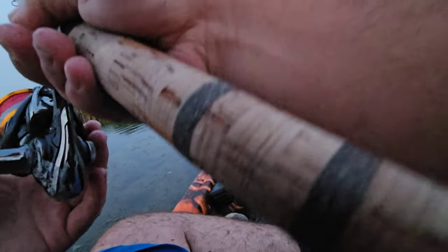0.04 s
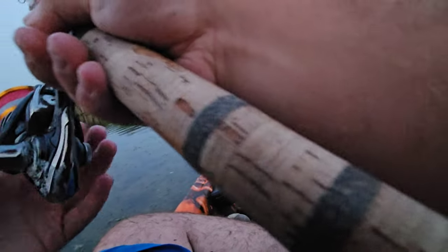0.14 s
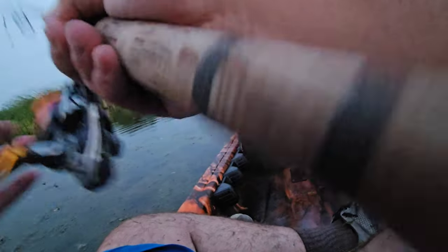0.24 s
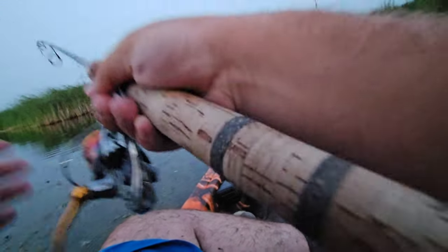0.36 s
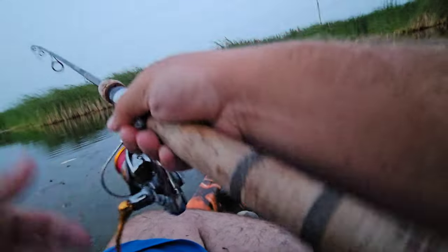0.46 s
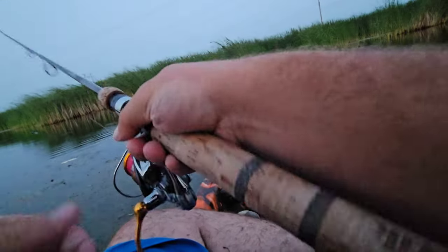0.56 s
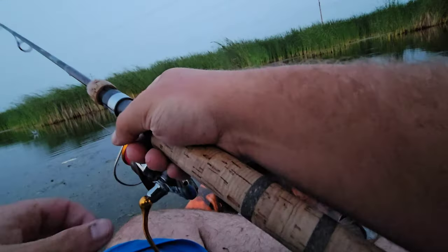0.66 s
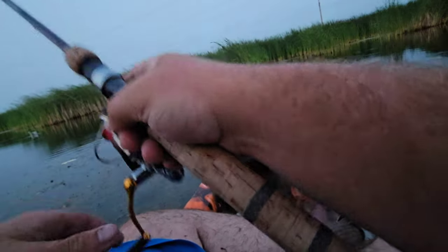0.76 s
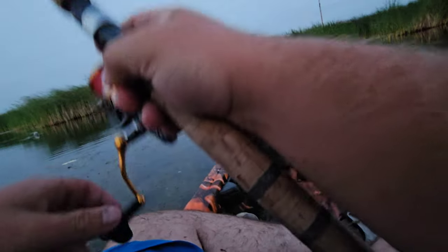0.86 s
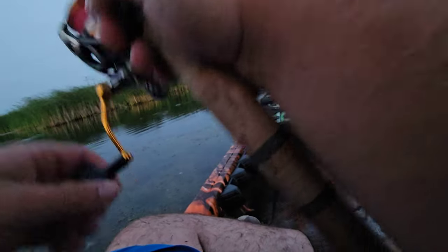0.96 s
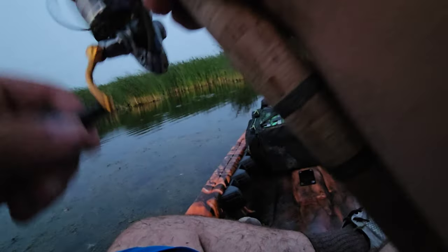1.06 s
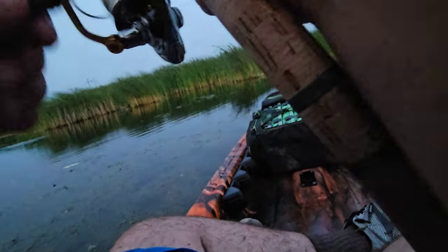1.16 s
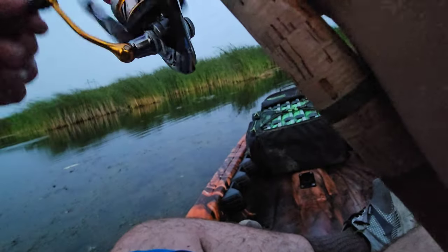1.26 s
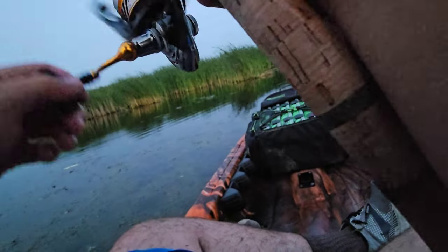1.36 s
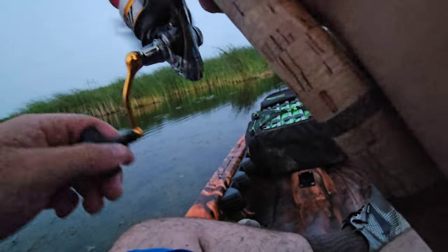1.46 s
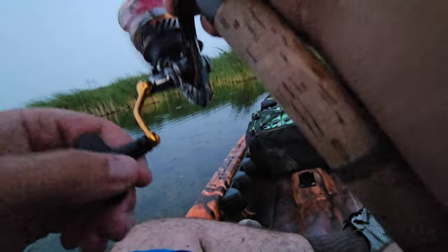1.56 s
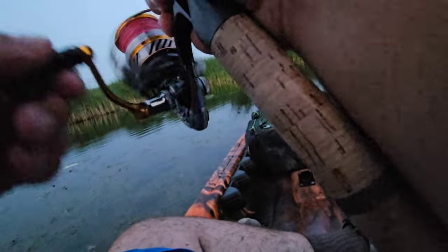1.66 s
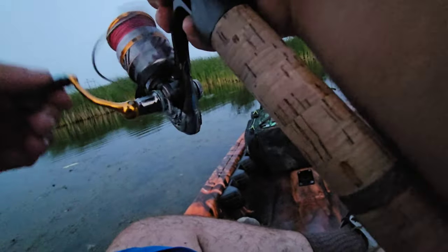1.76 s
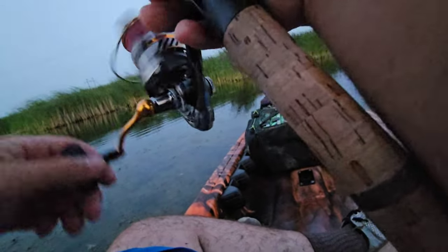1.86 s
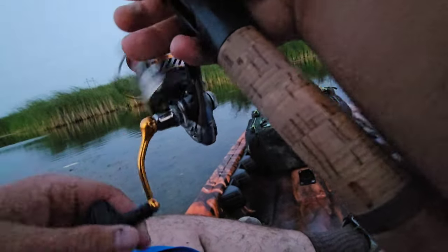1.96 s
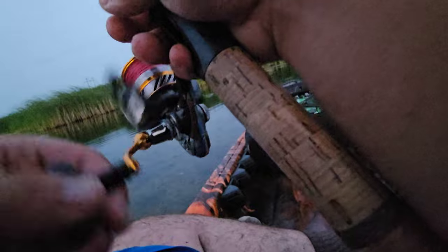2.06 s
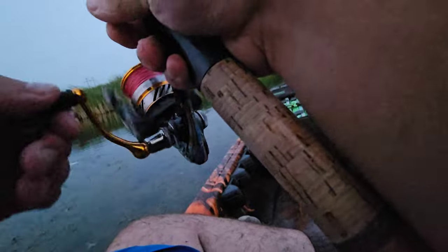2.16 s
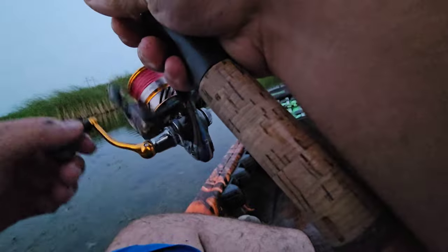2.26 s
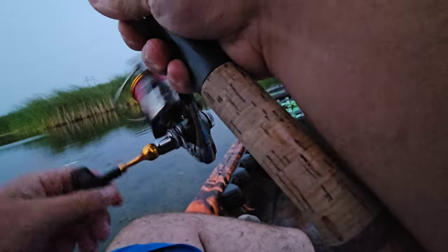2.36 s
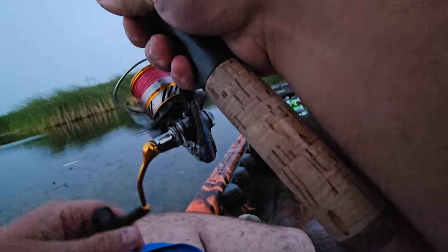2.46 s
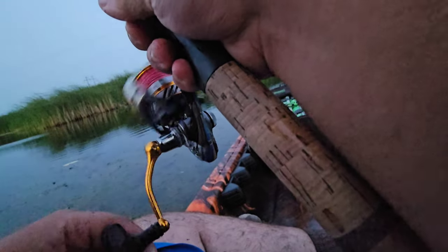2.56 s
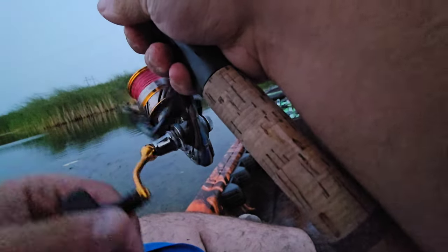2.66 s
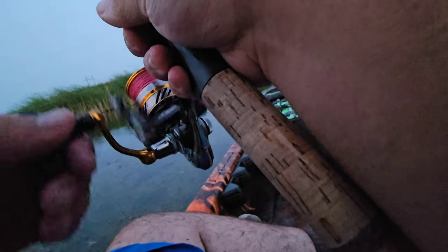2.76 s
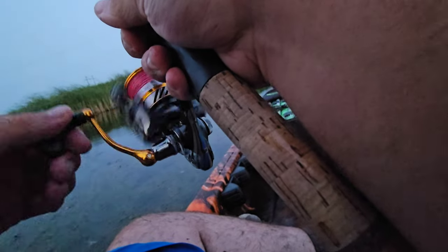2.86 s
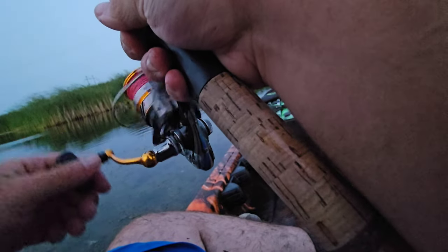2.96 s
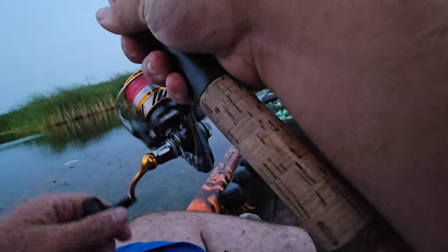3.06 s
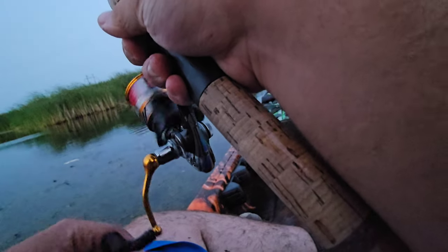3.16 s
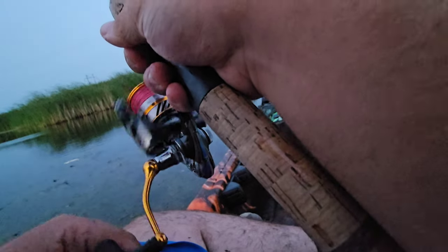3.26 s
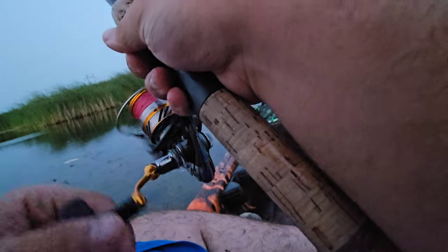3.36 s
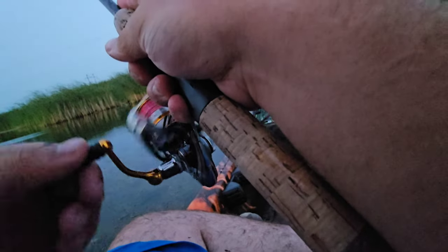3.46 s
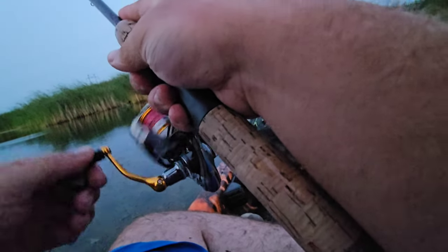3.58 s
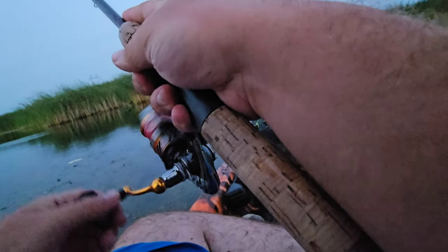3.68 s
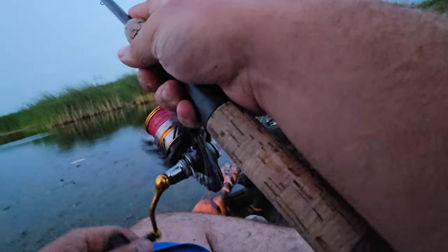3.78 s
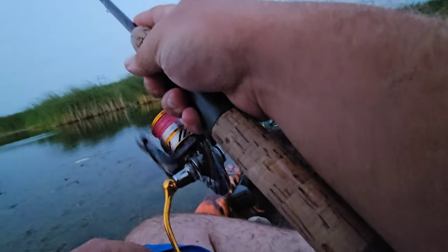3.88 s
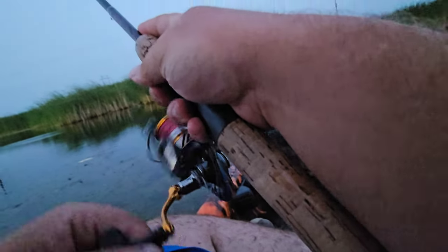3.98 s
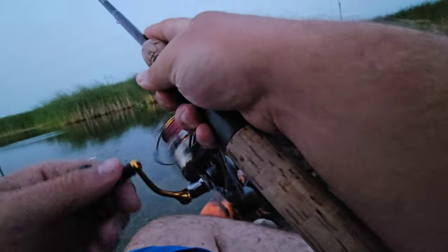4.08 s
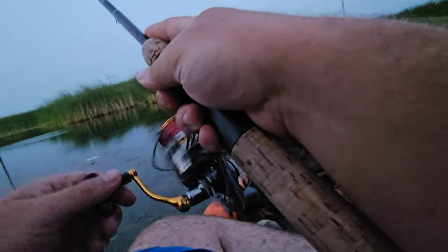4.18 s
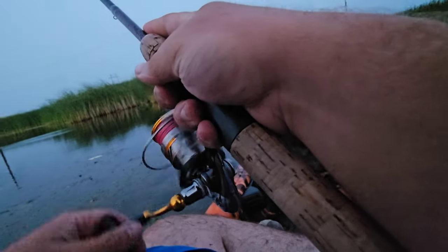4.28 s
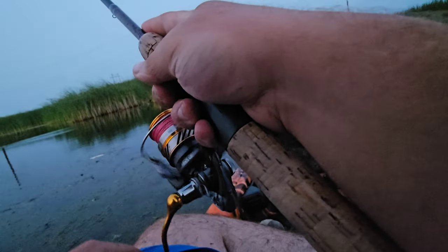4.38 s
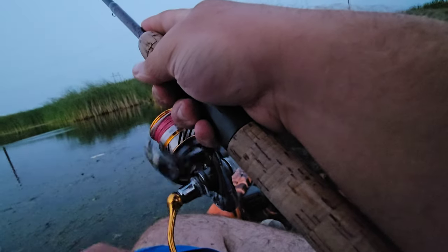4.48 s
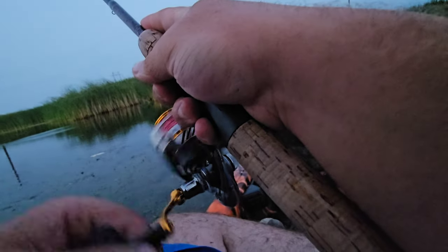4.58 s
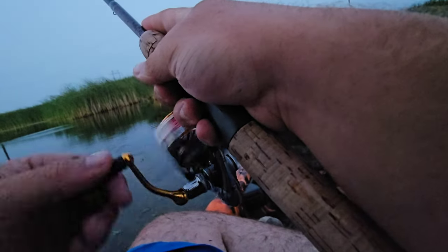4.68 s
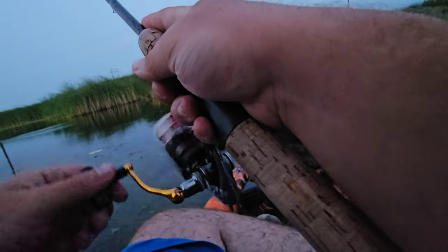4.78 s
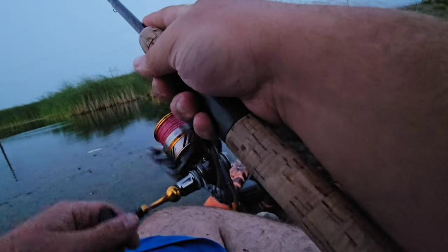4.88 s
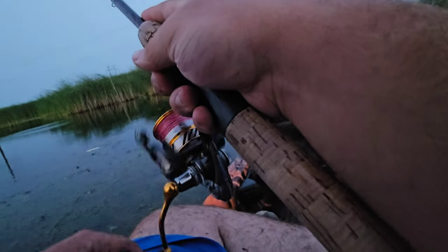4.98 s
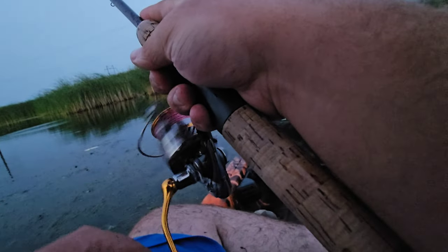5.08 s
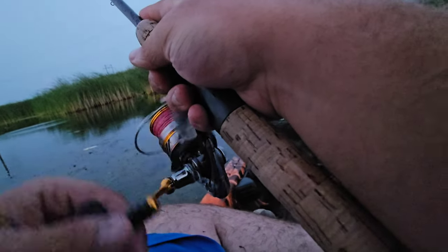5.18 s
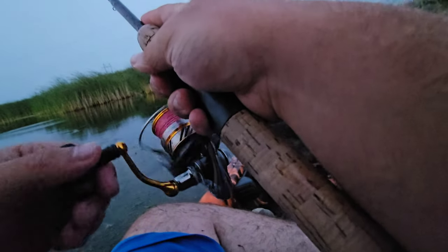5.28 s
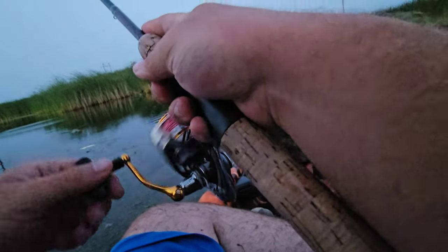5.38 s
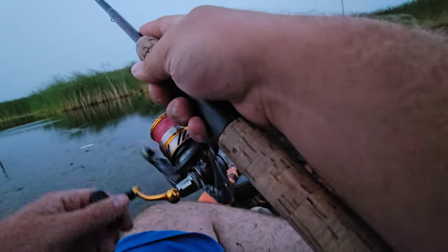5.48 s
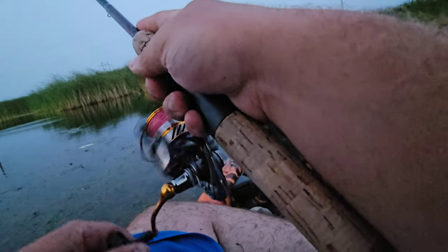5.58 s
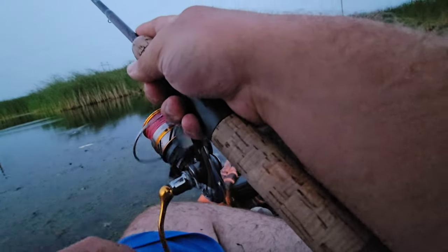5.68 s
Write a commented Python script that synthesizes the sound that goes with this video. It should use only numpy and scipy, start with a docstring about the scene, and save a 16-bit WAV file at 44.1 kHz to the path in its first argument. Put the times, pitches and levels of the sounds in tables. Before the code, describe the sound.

A metal bail snaps with clustered bright clicks and a dying loose rattle, followed by a short hollow knock. Just before one second cranking begins: a dry rasp with a low whine, surging with each turn, quickest around two seconds. Sparse ticks and dull bumps follow over faint breeze and hiss, heard close and dry outdoors.

```python
"""An angler in a small boat on a calm lake snaps the bail of a spinning reel shut and cranks the line in.
Light air rumbles and a thin line hiss runs throughout: filtered noise with moving levels.
At 0.1 s the bail clashes and rattles: noise bursts, damped modes and showers of tiny contacts.
Rod knocks and hull plops follow as damped tones. From 0.88 s gear-flank roughness, read at the uneven
cranking speed, rasps and whines; the mechanism ticks, and from 2 s the hands bump the rod with low thumps."""
import sys
import numpy as np
from scipy import signal
from scipy.fft import rfft, irfft, next_fast_len
from scipy.io import wavfile
from scipy.ndimage import uniform_filter1d

SR = 44100
rng = np.random.default_rng(int(sys.argv[2]) if len(sys.argv) > 2 else 0)


def generate_wav(sig):
    """Save sig (samples, or channels by samples) to the path in sys.argv[1] as 16-bit PCM at SR."""
    pcm = np.round(np.clip(np.atleast_2d(sig).T, -1, 1) * 32767).astype(np.int16)
    wavfile.write(sys.argv[1], SR, pcm)


N = 252642
TIME = np.arange(N) / SR

# Light breeze between the puffs, before its lumps: time_s, level_db
BREEZE_LEVEL = [(0, -70), (.12, -74), (.16, -61), (.22, -68), (1.0, -78.5), (1.5, -71.5), (2.4, -73.5),
                (2.8, -70.5), (3.35, -70), (3.6, -70.5), (4.55, -69), (4.85, -78.5), (5.73, -71)]
# Breeze spectrum: frequency_hz, density_db (per Hz)
BREEZE_SPECTRUM = [(15, -29.5), (35, -30.5), (60, 6), (85, 1), (125, 3), (170, -24.5), (220, 0), (300, -31),
                   (1000, -69)]
# Quiet-lake spectrum: frequency_hz, density_db (per Hz)
LAKE_SPECTRUM = [(15, -30.5), (35, -7.5), (120, -2.5), (220, 0), (270, -7.5), (350, -7), (550, 4),
                 (700, -7), (1000, -10), (1400, -14.5), (4200, -5), (6000, -29.5), (8500, -53),
                 (16000, -40)]

# Hollow rod knocks and hull plops: start_s, level_db (before offset), pitch_hz, t60_s, thud_db (against tone)
KNOCKS = [(.121, -46.5, 477, 0.073, 3.5), (.146, -43.5, 329.2, 0.102, 3.5),
          (0.5637, -26, 767.5, 0.01925, -59), (.577, -56, 700.6, 0.13, -23),
          (.598, -38, 760, 0.0139, -26.5), (0.676, -38, 369.5, 0.0295, -17), (.696, -45.5, 384, 0.069, -15),
          (.832, -42, 340.5, 0.0435, -14.5), (.865, -41, 323.3, 0.102, -9.5),
          (0.959, -48.5, 353, 0.067, -24.5), (1.191, -47, 337, 0.0505, -36),
          (1.73, -48, 370.6, 0.096, -8.5), (3.567, -51, 477.8, 0.131, -25.5),
          (5.46, -43, 509.6, 0.133, -46)]
# Dull body of a knock: frequency_hz, density_db (per Hz)
THUD_SPECTRUM = [(30, -41.5), (120, -18.5), (240, -7), (480, 3), (720, -5), (1100, -19.5), (4000, -53.5)]

# Soft bumps of hands and rod: centre_s, level_db (before offsets), pitch_hz
BUMPS = [(1.976, -56.5, 92.0), (2.327, -59, 89.8), (2.4, -61.5, 102), (2.6, -59.5, 77.0),
         (2.641, -58.5, 73.0), (2.73, -57, 99.73), (2.806, -61, 114.0), (2.941, -63, 75.0),
         (3.008, -58, 96.06), (3.265, -52.5, 85.05), (3.306, -53.0, 106.3), (3.348, -61.5, 79.02),
         (3.701, -58, 90.2), (3.748, -62, 82.0), (3.819, -61, 87.02), (3.87, -50, 91.4),
         (3.899, -53.5, 102.2), (4.1, -49, 94.82), (4.196, -61.5, 92.89), (4.262, -55, 114.7),
         (4.416, -65, 90.94), (4.475, -57.5, 76.96), (4.55, -62.5, 78.2), (4.615, -61, 134.1),
         (4.667, -54.0, 109.0)]
# Rub after a bump: frequency_hz, density_db (per Hz)
RUB_SPECTRUM = [(25, -20.5), (55, 2), (150, -6.5), (400, -12), (900, -35), (3000, -60)]

# Rod humming in the grip: time_s, level_db (before offset)
GRIP_LEVEL = [(0, -74), (.3, -66), (.6, -90.5), (.86, -66.5), (1.65, -60.5), (2.05, -63), (2.4, -71),
              (4.2, -70.5), (4.5, -74.5), (5.73, -77)]
# Rod hum spectrum: frequency_hz, density_db (per Hz)
ROD_SPECTRUM = [(100, -29.5), (260, -19.5), (330, 2), (420, 0.5), (560, -16), (900, -23.5), (3000, -43.5)]
# Line or skin sliding: centre_s, hiss_db (before offset), half_length_s
SLIDES = [(0.033, -68, 0.084), (0.533, -67, 0.0072), (1.154, -72, 0.024), (1.473, -71, 0.0586)]
# Line hiss spectrum: frequency_hz, density_db (per Hz)
HISS_SPECTRUM = [(500, -20), (2000, -7.5), (4500, 17), (6300, 16.5), (7500, 10), (8700, -4.5), (10400, 3),
                 (11600, 13.5), (13000, 4.5), (15500, 1), (17000, -36.5)]

# Bail striking its stop: start_s, level_db, t60_s
CLASHES = [(.116, -22, 0.1073)]
# Modes of the bail wire: pitch_hz, level_db, t60_s
WIRE_MODES = [(2500, -27, 0.054), (2794, -15, 0.044), (3730, -9, 0.0327), (4180, -25, 0.065),
              (4650, -29, 0.045), (5230, -24, .04)]
# Modes of the rod and reel frame under the bail: pitch_hz, level_db (before offset), t60_s
FRAME_MODES = [(234.3, -44.5, 0.25), (314.2, -36.5, 0.28), (364.8, -38, .2), (464.4, -38, 0.322),
               (541, -42.5, 0.352), (819, -40, .25), (1308, -37, 0.35), (2358, -44, 0.11),
               (2929, -41, 0.34), (3990, -39, .4)]

# Metal clicks of bail and mechanism: start_s, level_db, ring_hz, ring_db, t60_s,
# knock_db (low), body_db (hollow), edge_db (bright), pan_db (left-right)
CLICKS = [(0.103, -29.5, 4260, 11, 0.0021, -3, -16, -8, 4.5),
          (0.1148, -29.5, 3350, 3.5, 0.0063, 0.5, -7.5, -1.5, 2.5),
          (0.1178, -18.5, 2780, 5.5, 0.0039, -6.5, -4.5, -1.5, 1.5),
          (0.1188, -20, 2768, 15.5, 0.0094, -1.5, -1.5, 2.5, -10.5),
          (0.1217, -24, 3560.0, -2.5, 0.0276, -1.5, 1, 1.5, -7.5),
          (0.1303, -23, 4050, 9.0, 0.0049, -1.5, -10.5, -4.5, 5.5),
          (0.1485, -36, 4400.0, 10.5, 0.0053, 1, 0.5, -3.5, 3.0),
          (0.1554, -31, 3800.0, 5, 0.0074, -3, -5.5, 8.5, 2),
          (0.159, -31, 3050.0, 8.0, 0.0061, -4.5, -10, -16.5, 5),
          (0.1642, -35, 4710.0, 8.5, 0.005, -5.5, -13.5, 6.5, -13.5),
          (0.1707, -21.0, 4330, 14.5, 0.0046, 2, -7, -2, 0.5),
          (0.1825, -46.5, 5320.0, 7, 0.006, 0.5, -3.5, -3.5, 0.5),
          (0.208, -44.5, 5150, 9, 0.006, -1.5, -0.5, 2.5, -4.5),
          (0.2149, -40, 4130, 17, 0.0072, -3.5, -6.5, 1.5, -0.5),
          (0.221, -44, 5240.0, 9.5, 0.0054, -12, 6.5, 1, -0.5),
          (0.2315, -39, 4200.0, 5.5, 0.0038, 3.5, 0, -8.5, -3),
          (0.2351, -42.5, 5390.0, 6, 0.0089, 4, 3, 1, -6.5),
          (0.2423, -28.5, 4330, 10.5, 0.0116, 0, -2.5, 0, -3),
          (0.2621, -45, 4260.0, 14.5, 0.0082, 8.5, 2, -12.5, -4.0),
          (0.276, -45.5, 4260.0, 3, 0.025, 0.0, 2, 3.5, -8.5),
          (0.3087, -51, 4200.0, 10, 0.015, -4, -8, -11.0, -6),
          (0.326, -41.0, 4350.0, 5, 0.023, 8.5, 6.5, -6.0, -2),
          (0.3443, -45.5, 5600.0, 9.0, 0.0103, 1, 6, 1, -2),
          (0.3482, -50, 4110.0, 7, 0.013, -3.5, -6, -9.5, -1),
          (0.367, -49.5, 3330.0, 5, 0.0102, -3.0, -1.5, 0, -3),
          (0.3954, -41.5, 3360.0, 1, 0.0034, 2.5, -5.5, 8, -3.5),
          (0.399, -29.5, 4116, 13.5, 0.0121, 5, -2.5, 2.5, -2),
          (0.4192, -51, 3160.0, 14.5, 0.0091, 4.5, 4, 4, -10),
          (0.434, -49.5, 4150.0, 1.5, 0.0091, 9, -0.5, -17.5, -4.5),
          (0.4717, -42.5, 4400.0, 6.5, 0.0113, 2.0, -2, 4.5, -5.0),
          (0.4939, -50.5, 3350.0, 11, 0.0206, -0.5, 11.5, 0.5, -5.5),
          (0.5286, -47, 4100.0, 3, 0.02, -10.0, -12, -2, -2),
          (0.627, -46.5, 4330, 13, 0.0143, -0.5, 16, 13, -8.5),
          (0.6447, -44.5, 4400, 10.5, 0.0081, -1.5, -4, 2.5, -4.5),
          (0.6721, -36.5, 3140, 5.5, 0.0111, 5, -9, -8, 4),
          (0.675, -33, 3400, 12.5, 0.0119, 2.5, 6.0, 7.5, -2.5),
          (0.8026, -36, 4024, 9, 0.0085, -8, 2.5, -1, -0.5),
          (0.8249, -51, 2960.0, 6.5, 0.0054, -8, -12, -9.5, 0.0),
          (0.8468, -52.5, 3680.0, 10, 0.0062, -7, 2.5, 1, -7.5),
          (0.8567, -47.5, 2890, 12.0, 0.0102, -14, -7.5, 0.5, -10),
          (0.862, -37, 3200, 3.5, 0.0084, -7.5, 15.5, 9.5, 0.0),
          (0.8884, -49, 4180.0, 3, 0.0108, -1.5, 9, -14.5, -3.5),
          (0.894, -48, 2730.0, 14, 0.0104, 1, -8.5, -1.5, -7),
          (1.1586, -48, 3200, 8.5, 0.0055, 10.5, 9.5, 13.5, -8),
          (1.2225, -36, 3596, 7, 0.0101, -14.5, 0.5, -4.5, -4.0),
          (1.2872, -50.5, 4940, 5.5, 0.00205, 7, 5, 2.0, -18.5),
          (1.326, -45, 2930, 6.5, 0.0108, 6, 1.5, -3, -1.5),
          (1.7298, -39.5, 5025, 12, 0.008, -14.5, 1.5, 0.5, -4.5),
          (1.7638, -56, 4830, 3.5, 0.004, 10.5, 7, 2.5, -17),
          (1.8326, -47, 4020, 11.5, 0.00495, -3.5, 8, -25.5, -8),
          (2.1641, -43.5, 3070, 4, 0.0102, -5, 6.5, -5, -4.5),
          (2.319, -57.5, 2030, 4, 0.0052, 11, 12, -8.5, -9),
          (2.7562, -54, 2980.0, 8.5, 0.00435, 8.5, 2, -9.0, -3.5),
          (3.003, -54.0, 3180, 12.5, 0.0333, 16, 0.5, -12.5, -6.0),
          (3.435, -47, 4569, 4.5, 0.0061, 6, 8.5, -7.5, -1.5),
          (3.9777, -50.5, 4930, 6, 0.00501, 7, 4, 2.5, -17),
          (4.0279, -42.5, 4452, 6.5, 0.008, 5, -1, -7.0, -4),
          (4.2527, -56, 5300, 3, 0.0062, 5.0, 2, 1, -19),
          (4.5181, -55.5, 4800, 6.5, 0.00605, 5.5, 2, 4, -15),
          (4.6221, -42, 4480, 10.5, 0.00639, 4.5, 4.5, -5, -5),
          (4.7281, -57.5, 4820, 7, 0.00977, 13, -1.0, 1.5, -18.5),
          (4.9839, -52, 2160, 6, 0.00395, 10, 13.5, -3.5, 1.0),
          (5.0686, -56.5, 2394, 4.5, 0.003376, 5, 1, -7.5, -4.5),
          (5.2337, -49, 4243, 8, 0.00504, 3.5, 4.5, -16.5, -4.5)]
# Basic click spectrum: frequency_hz, density_db (per Hz)
CLICK_SPECTRUM = [(30, -52), (120, -18.5), (350, -9), (1000, -8.5), (2000, 2.5), (3000, -0.5), (4400, 4),
                  (5500, 1), (6400, -10.5), (7500, -9.5), (8700, -28.5), (10300, -29.5), (11700, -30),
                  (14500, -35.5), (16500, -42.5)]
# Level is referred to the span; a short silence leads into each click
CLICK_SPAN_S, CLICK_LEAD_S = .005, .002
# Mean left delay, its relative scatter, and the snap's delay after first touch
CLICK_LAG_S, LAG_SCATTER, SNAP_AFTER_S = .00023, .4, .0003
CLICK_TAIL_T60_S = .085  # frame ringing after a click

# Jolts that shake the loose parts: start_s, level_db, t60_s
JOLTS = [(0.093, -44.5, 0.214), (0.105, -33, 0.21), (.153, -32, 0.1215), (0.209, -39, 0.162),
         (0.273, -48.5, 0.266), (0.34, -48, 0.082), (0.416, -55.5, 0.222), (.524, -53.5, 0.765),
         (0.676, -49, 0.056), (0.826, -50, 0.243)]
RATTLE_PER_S = 480  # mean rate of tiny loose contacts

# Cranking pace, surging with each push on the handle: time_s, speed_teeth_per_s
CRANK_SPEED = [(.9, 53.6), (1.01, 51.9), (1.24, 55.9), (1.62, 67.5), (1.78, 62.05), (2.07, 68.34),
               (2.27, 50.07), (2.53, 47.66), (2.74, 59.3), (2.87, 47.74), (2.99, 47.05), (3.24, 36.54),
               (3.42, 49.87), (3.56, 53.45), (3.87, 50.6), (4.08, 59), (4.27, 44.54), (4.63, 59.3),
               (4.82, 49.14), (5.15, 51.5), (5.32, 41.6), (5.52, 46.75), (5.73, 43.05)]
# Gear load, as levels at the usual speed before offsets: time_s, rasp_db, whine_db
GEAR_LOAD = [(.9, -66.5, -64), (1.09, -58.5, -71), (1.3, -61.5, -79.5), (1.65, -62, -68.5),
             (2.1, -65, -65.5), (2.4, -66.5, -72), (2.9, -65.5, -72.5), (3.25, -63.5, -67.5),
             (3.6, -64.5, -70), (4.1, -66.5, -68.5), (4.4, -65, -65.5), (4.65, -64.5, -66),
             (4.9, -64.5, -66), (5.12, -63.5, -64.5), (5.3, -67.5, -68), (5.55, -64, -62.5),
             (5.73, -65, -63.5)]
# Tooth-flank ripple: cycles_per_tooth, width_cycles_per_tooth, level_db (above plain grain)
TOOTH_RIPPLE = [(14.82, 0.56, 14.5), (28.63, 1.29, 8), (40.96, 3.93, 3)]
# Gear rasp spectrum: frequency_hz, density_db (per Hz)
GEAR_SPECTRUM = [(150, -23.5), (300, -5), (480, 4.5), (750, -16), (1050, -5), (1550, -4.5), (2000, 0.5),
                 (2700, 4), (4300, -2.5), (5300, -6), (6300, -10.5), (7700, -28), (8700, -48.5),
                 (16000, -35.5)]
# Gear-housing resonances, and a bright peak near 11.6 kHz that other sounds share: frequency_hz, width_hz,
# level_db
HOUSING_RESONANCES = [(1062, 36, -2.5), (1336.2, 35.2, 13.5), (1411.5, 73, -2.5), (1860, 99, -1),
                      (2536, 85.4, -10.5), (3236, 111, 4), (3732, 217, 5), (4420, 62, 0), (5286, 305, 6),
                      (7380, 312, 12), (11590, 610, 24.5)]
# Moments when the hollow sings up: centre_s, level_db (against rasp), half_length_s
SINGING = [(1.148, 0, 0.0273), (1.225, -5, 0.046), (1.312, 2, 0.03), (1.71, -1, 0.0395),
           (2.084, 2.5, 0.0148), (2.327, -1.5, 0.034), (2.562, -1.5, 0.056), (3.35, -4.5, 0.13),
           (3.96, -9, 0.0375), (5.124, -3, 0.026)]
# Bright rasp band, drifting as the reel moves in the grip: time_s, frequency_hz, level_db (against rasp)
SHEEN = [(1.5, 4016, -15.5), (2.1, 4150, -6.5), (3.2, 4016, -16.5), (3.55, 3691, -9.5), (4.7, 3518, -20.5),
         (5.73, 3757, -6.5)]
SHEEN_WIDTH_HZ = 150
CRANK_START_S, USUAL_TEETH_PER_S = .88, 45.54
RASP_DB_PER_DOUBLING = 12  # per doubling of cranking speed
# The spool rides in and out and retunes the hollow of the rotor
TEETH_PER_STROKE, SPOOL_OUT_AT_TOOTH = 68.86, 48.3
HOLLOW_HZ, HOLLOW_SWING_HZ, HOLLOW_DB, HOLLOW_SWING_DB = 2111, 342.5, -16, -5.5
# Depth of unevenness: with each tooth, by chance in the whine, by chance in each band
TOOTH_THROB_DB, WHINE_WAVER_DB, FLUTTER_DB = 2.2, 3.0, 2.9
# Whine half width, and fall of its skirts per decade
WHINE_WIDTH_CYCLES, WHINE_SKIRT_DB = 1.15, 20

# Short echoes off arm, knees and hull: delay_s, level_db
ECHOES = [(.0019, -42), (.0034, -17), (.0057, -14)]
# Stereo balance, the right microphone being nearer the reel: frequency_hz, left_right_db
BALANCE = [(60, -6), (200, -6.5), (380, -11), (700, -6.5), (1300, -5), (2400, -3.5), (4400, -2.5),
           (8000, -8.5), (12000, 5.5), (15000, -1)]
LEFT_LAG_S, CUTOFF_HZ = 0.0003987, 15800


def from_db(db):
    """Decibel law: level to amplitude gain."""
    return 10 ** (np.asarray(db) / 20)


def decay(t, t60):
    """Exponential damping: amplitude falls 60 dB in t60 seconds."""
    return from_db(-60 * t / t60)


def onset(t, rise_s):
    """First-order build-up with time constant rise_s."""
    return 1 - np.exp(-t / rise_s)


def rms_one(x):
    """Normalization to unit root-mean-square."""
    return x / np.sqrt(np.mean(x ** 2) + 1e-20)


def in_time(rows):
    """Linear interpolation of each column of a curve at every sample."""
    s, *columns = np.transpose(rows)
    return [np.interp(TIME, s, column) for column in columns]


def at_hz(points, hz):
    """Interpolation of a spectrum on a logarithmic frequency axis."""
    f, db = np.transpose(points)
    return np.interp(np.log(np.maximum(hz, 1)), np.log(f), db)


def humps(peaks, f):
    """Superposition of Gaussian peaks in decibels."""
    return sum(db * np.exp(-.5 * ((f - centre) / width) ** 2) for centre, width, db in peaks)


def colour(x, points, peaks=()):
    """Minimum-phase filtering: a folded cepstrum gives a causal response."""
    size = 2 * next_fast_len(x.shape[-1] // 2 + 2048)
    hz = np.arange(size // 2 + 1) * SR / size
    cepstrum = irfft(np.log(from_db(at_hz(points, hz) + humps(peaks, hz))))
    cepstrum[1:size // 2] *= 2
    cepstrum[size // 2 + 1:] = 0
    response = np.exp(rfft(cepstrum))
    return irfft(rfft(x, size) * response)[..., :x.shape[-1]]


def evened(x, size=45):
    """Spectral whitening: flatten a burst's broad spectrum and keep its fine grain."""
    spectrum = rfft(x)
    power = uniform_filter1d(uniform_filter1d(np.abs(spectrum) ** 2, size), size)
    return irfft(spectrum / np.sqrt(power + 1e-12), x.shape[-1])


def add(out, s, sound):
    """Superposition: mix a sound in at time s."""
    i = max(round(s * SR), 0)
    out[..., i:i + sound.shape[-1]] += sound[..., :N - i]


def two_ports(paths, direct, lag_s=LEFT_LAG_S):
    """Partial coherence: one path reaches both microphones, later at the left; two scattered ones do not."""
    share = np.clip(direct, 0, 1)
    t = np.arange(paths.shape[-1]) / SR
    left = np.interp(t - lag_s, t, paths[0], left=0)
    both = np.array([left, paths[0]])
    return np.sqrt(share) * both + np.sqrt(1 - share) * paths[1:]


def noise(points, direct):
    """Coloured stereo noise of unit rms."""
    return rms_one(colour(two_ports(rng.standard_normal((3, N)), direct), points))


def wander(per_s):
    """Random modulation: straight lines between normal deviates, per_s of them each second."""
    knots = rng.standard_normal(8000)
    return np.interp(TIME * per_s, np.arange(len(knots)), knots)


def swell(s, db, rise_s, fall_s):
    """Gaussian envelope around time s, with separate rise and fall."""
    width_s = np.where(TIME < s, rise_s, fall_s)
    return from_db(db) * np.exp(-.5 * ((TIME - s) / width_s) ** 2)


def shade(x):
    """Acoustic shadowing: a frequency-dependent level difference between the microphones."""
    half = at_hz(BALANCE, np.arange(N // 2 + 1) * SR / N) / 2
    return irfft(rfft(x) * from_db([half, -half]), N)


def boat(x):
    """Early reflection: nearby surfaces return a few faint delayed copies."""
    echoes = sum(from_db(db) * np.pad(x, ((0, 0), (round(delay_s * SR), 0)))[:, :N]
                 for delay_s, db in ECHOES)
    return x + echoes


def air(lake_db=-65, breeze_db=0, lumps_db=3.5, lumps_per_s=26):
    """Wind noise: a lumpy breeze on the microphone ports over a quiet lake."""
    level_db = in_time(BREEZE_LEVEL)[0] + breeze_db + lumps_db * wander(lumps_per_s)
    breeze = from_db(level_db) * noise(BREEZE_SPECTRUM, direct=1.0)
    return breeze + from_db(lake_db) * noise(LAKE_SPECTRUM, direct=0.676)


def knocks(level_db=2, thud_t60=0.14, swell_s=0.00161, size=9000):
    """Damped resonance: soft blows and pockets of air ring as low tones over a dull thud."""
    out = np.zeros((2, N))
    t = np.maximum(np.arange(size) / SR - np.array([[LEFT_LAG_S], [0]]), 0)
    for s, db, hz, t60, thud_db in KNOCKS:
        tone = decay(t, t60) * np.sin(2 * np.pi * hz * t)
        thud = rms_one(colour(two_ports(rng.standard_normal((3, size)), direct=0.872), THUD_SPECTRUM))
        thud *= from_db(thud_db) * decay(t, thud_t60)
        add(out, s, from_db(db + level_db) * onset(t, swell_s) * (tone + thud))
    return out


def bumps(level_db=2.0, rise_s=0.003084, fall_s=0.005745, rub_db=-7, rub_s=0.0158):
    """Heavily damped impact and friction: a low thump of a swing or two, then a short dull rub."""
    thumps, rubbing = np.zeros(N), np.zeros(N)
    for s, db, hz in BUMPS:
        swing = np.sin(2 * np.pi * (hz * TIME + rng.random()))
        thumps += swell(s, db + level_db, rise_s, fall_s) * swing
        rubbing += swell(s, db + rub_db, rise_s, rub_s)
    return thumps + rubbing * noise(RUB_SPECTRUM, direct=0.445)


def handling(hum_db=-1.0, slide_db=4, line_db=-81.5):
    """Resonance and friction: the rod hums in the grip; line hisses steadily, and line or skin slides."""
    hum = from_db(in_time(GRIP_LEVEL)[0] + hum_db) * noise(ROD_SPECTRUM, direct=0.753)
    sliding = sum(swell(s, db + slide_db, half_s, half_s) for s, db, half_s in SLIDES)
    return hum + np.hypot(from_db(line_db), sliding) * noise(HISS_SPECTRUM, direct=0.074)


def mode_swing(hz, t, rise_s):
    """Modal vibration: three sines of random phase, one per path, building up together."""
    return np.sin(2 * np.pi * (hz * t + rng.random((3, 1)))) * onset(t, rise_s)


def bail(ring_db=-1, bright_db=11, size=16000):
    """Modal excitation: the sprung wire buzzes against its stop and sets rod and frame ringing."""
    buzz, ring, t = np.zeros((2, N)), np.zeros((2, N)), np.arange(size) / SR
    resonances = [(2823, 225, 6), (1500, 830, 0.0), (11680, 1530, bright_db)]  # Hz, width Hz, dB
    for s, db, t60 in CLASHES:
        chatter = two_ports(rng.standard_normal((3, size)), direct=0.27, lag_s=CLICK_LAG_S)
        chatter = rms_one(colour(chatter, CLICK_SPECTRUM, resonances))
        add(buzz, s, chatter * from_db(db) * decay(t, t60))
        for hz, mode_db, mode_t60 in FRAME_MODES:
            mode = mode_swing(hz, t, 0.0055) * from_db(mode_db + ring_db) * decay(t, mode_t60)
            add(ring, s, two_ports(mode, direct=1.0))
        for hz, mode_db, mode_t60 in WIRE_MODES:
            mode = mode_swing(hz, t, 0.0013) * from_db(mode_db) * decay(t, mode_t60)
            add(buzz, s, two_ports(mode, direct=0.81, lag_s=CLICK_LAG_S))
    return buzz + shade(ring)


def clicks(level_db=0, ring_width_hz=330, knock_hz=800, knock_width_hz=450, body_hz=1950,
           body_width_hz=600, edge_hz=7000, edge_width_hz=1200, snap_db=14, tail_db=-29,
           hardness=1.0, middling_db=-33, size=3000):
    """Impact: a hard snap and short scuff excite a brief ring in the struck part and a faint frame tail."""
    out, t = np.zeros((2, N)), np.maximum(np.arange(size) / SR - CLICK_LEAD_S, 0)
    for s, db, hz, ring_db, t60, knock_db, body_db, edge_db, pan_db in CLICKS:
        fade = decay(t, max(t60, .001)) + from_db(tail_db) * decay(t, CLICK_TAIL_T60_S)
        fade *= onset(t, 0.00016)
        # Each click reaches the left microphone with its own delay
        lag_s = CLICK_LAG_S * (1 + LAG_SCATTER * rng.standard_normal())
        contact = two_ports(rng.standard_normal((3, size)) * fade, direct=.13, lag_s=lag_s)
        for port, delay_s in zip(contact, (lag_s, 0)):
            add(port, CLICK_LEAD_S + SNAP_AFTER_S + delay_s, from_db([snap_db]))
        resonances = [
            (hz, ring_width_hz, ring_db),
            (knock_hz, knock_width_hz, knock_db),
            (body_hz, body_width_hz, body_db),
            (edge_hz, edge_width_hz, edge_db),
            (12200, 1700, hardness * (db - middling_db)),  # harder blows are brighter
        ]
        click = colour(evened(contact), CLICK_SPECTRUM, resonances)
        click /= np.sqrt((click ** 2).sum(axis=1, keepdims=True) / (CLICK_SPAN_S * SR))
        pan = np.array([[pan_db], [-pan_db]]) / 2
        add(out, s - CLICK_LEAD_S, click * from_db(db + level_db + pan))
    return out


def rattle(spread_db=7, level_db=0, rise_s=0.0014, contact_s=0.00285):
    """Random impacts: play in rotor and handle gives a dying shower of tiny contacts after each jolt."""
    happens = rng.random(N) < RATTLE_PER_S / SR
    sizes = from_db(spread_db * rng.uniform(-0.43, 1, N)) * happens
    bursts = signal.lfilter([1], [1, -np.exp(-1 / (contact_s * SR))], sizes + 1e-18)
    contacts = two_ports(rng.standard_normal((3, N)) * bursts, direct=0.144, lag_s=CLICK_LAG_S)
    shaking = np.zeros(N)
    for s, db, t60 in JOLTS:
        add(shaking, s, from_db(db + level_db) * decay(TIME, t60) * onset(TIME, rise_s))
    resonances = [(3830, 350, 3.5), (6960, 2400, -10.5)]  # Hz, width Hz, dB
    return shaking * rms_one(colour(contacts, CLICK_SPECTRUM, resonances))


def cranking():
    """Kinematics: speed integrates to teeth passed; speed is also given in doublings of the usual."""
    speed, = in_time(CRANK_SPEED)
    started = TIME > CRANK_START_S
    return np.cumsum(speed * started) / SR, np.log2(speed / USUAL_TEETH_PER_S)


def flank(teeth, shape_db, alike, size=512):
    """Roughness excitation: a flank profile, partly the same on every tooth, read at passing speed."""
    count = next_fast_len(int(teeth[-1] + 2), True)
    share = np.clip(alike, 0, 1)
    common = np.sqrt(share) * rng.standard_normal((size, 3))
    surface = common + np.sqrt(1 - share) * rng.standard_normal((count, size, 3))
    cycles = np.arange(count * size // 2 + 1) / count  # per tooth
    surface = irfft(rfft(np.concatenate(surface).T) * from_db(shape_db(cycles)))
    place = np.arange(count * size)
    return rms_one(np.array([np.interp(teeth * size, place, path) for path in surface]))


def flutter(x, per_s=22, count=16):
    """Independent band modulation: shifting contact points make each stretch of spectrum swell and fade."""
    place = np.interp(np.arange(N // 2 + 1) * SR / N, [700, 6000], [0, count - 1])
    spectrum = rfft(x)
    out = np.zeros_like(x)
    for k in range(count):
        band = irfft(spectrum * np.maximum(1 - np.abs(place - k), 0), N)
        out += band * from_db(FLUTTER_DB * wander(per_s))
    return rms_one(out)


def moving_resonance(x, centre_hz, width_hz, size=256):
    """Two-pole resonance, retuned block by block and scaled to unit rms."""
    out, state = np.zeros_like(x), np.zeros((len(x), 2))
    r = np.exp(-np.pi * width_hz / SR)
    for i in range(0, N, size):
        poles = [1, -2 * r * np.cos(2 * np.pi * centre_hz[i] / SR), r * r]
        out[:, i:i + size], state = signal.lfilter([1, 0, -1], poles, x[:, i:i + size], zi=state)
    return rms_one(out)


def gear_rasp(teeth, contact, grit_db=2.5, spool_width_hz=130):
    """Sliding contact: rough flanks excite the housing and the retuned hollow of the rotor."""
    grain = flank(teeth, lambda cycles: humps(TOOTH_RIPPLE, cycles), alike=0.281)
    grit = from_db(grit_db * wander(500))  # high spots catch for a millisecond or two
    rasp = two_ports(grain * contact * grit, direct=0.217)
    rasp = flutter(colour(rasp, GEAR_SPECTRUM, HOUSING_RESONANCES))
    stroke = np.cos(2 * np.pi * (teeth - SPOOL_OUT_AT_TOOTH) / TEETH_PER_STROKE)
    hollow = moving_resonance(rasp, HOLLOW_HZ + HOLLOW_SWING_HZ * stroke, spool_width_hz)
    singing = sum(swell(s, db, half_s, half_s) for s, db, half_s in SINGING)
    hollow *= np.hypot(from_db(HOLLOW_DB + HOLLOW_SWING_DB * stroke), singing)
    sheen_hz, sheen_db = in_time(SHEEN)
    sheen = from_db(sheen_db) * moving_resonance(rasp, sheen_hz, SHEEN_WIDTH_HZ)
    return rms_one(rasp + sheen + hollow)


def gear_whine(teeth, contact, whine_cycles=14.024):
    """Periodic excitation: flank ripple sounds a pitch proportional to cranking speed."""
    def skirts(cycles):
        """Resonance-like skirts around the ripple rate, in decibels."""
        return -WHINE_SKIRT_DB * np.log10(1 + ((cycles - whine_cycles) / WHINE_WIDTH_CYCLES) ** 2)

    ripple = flank(teeth, skirts, alike=0.2)
    return rms_one(two_ports(ripple * contact, direct=0.947)) * from_db(WHINE_WAVER_DB * wander(21))


def gears(rasp_db=1, whine_db=1, take_up_s=0.162):
    """Gear meshing: each tooth throbs as it slides in; the rasp also grows with speed."""
    teeth, doublings = cranking()
    rasp_level, whine_level = in_time(GEAR_LOAD)
    turning = np.clip((TIME - CRANK_START_S) / take_up_s, 0, 1)
    contact = turning * rms_one(from_db(TOOTH_THROB_DB * np.cos(2 * np.pi * teeth)))
    rasp_gain = from_db(rasp_level + rasp_db + RASP_DB_PER_DOUBLING * doublings)
    whine_gain = from_db(whine_level + whine_db)
    return rasp_gain * gear_rasp(teeth, contact) + whine_gain * gear_whine(teeth, contact)


def scene():
    """Free-field superposition: all is within arm's reach, and open water gives no reverberation."""
    shaded = air() + knocks() + bumps() + boat(handling() + gears())
    return shade(shaded) + bail() + clicks() + rattle()


def record(dry):
    """Saturation and band limiting: the highest peaks are rounded and the top is cut steeply."""
    rounded = .8 * np.tanh(dry / .8)
    low_pass = signal.ellip(10, .1, 80, CUTOFF_HZ, fs=SR, output="sos")
    return signal.sosfilt(low_pass, rounded)


dry = scene()
out = record(dry)
generate_wav(out)
```